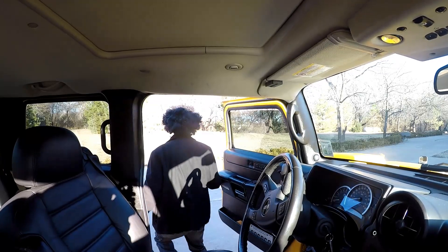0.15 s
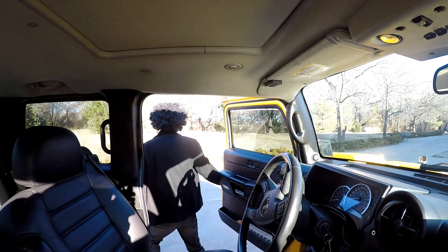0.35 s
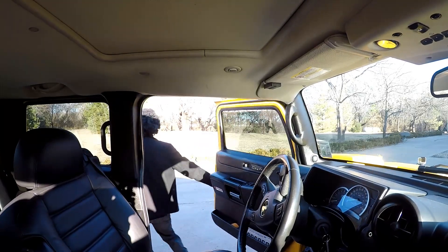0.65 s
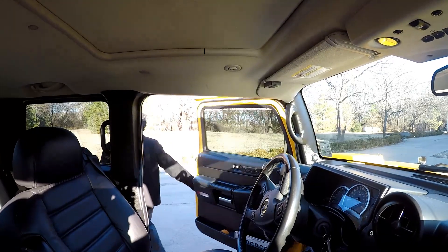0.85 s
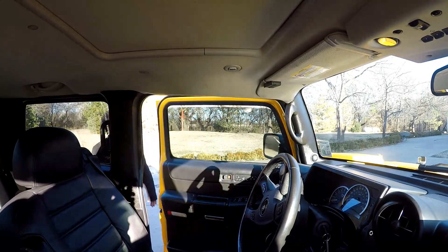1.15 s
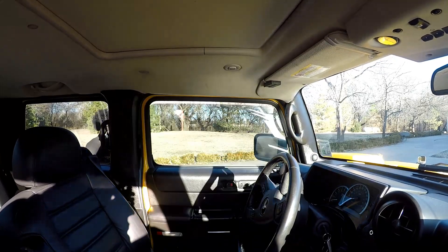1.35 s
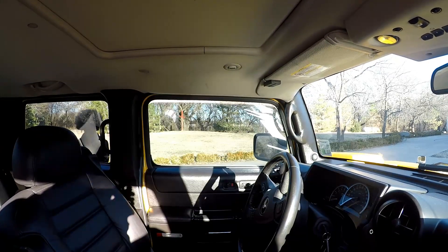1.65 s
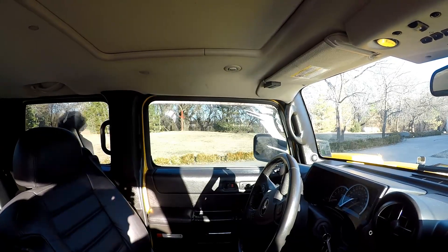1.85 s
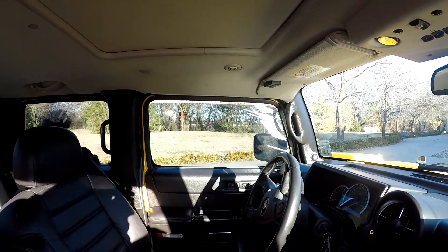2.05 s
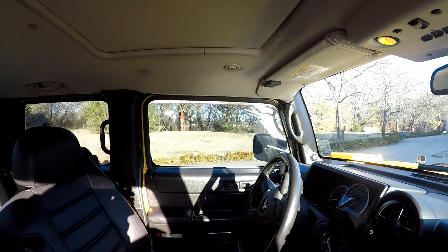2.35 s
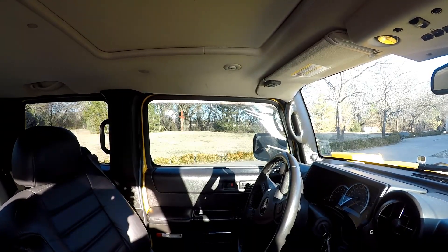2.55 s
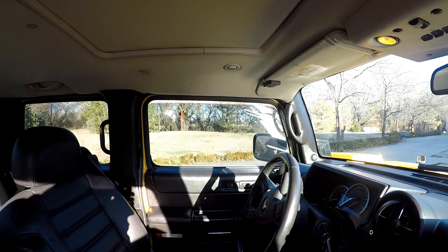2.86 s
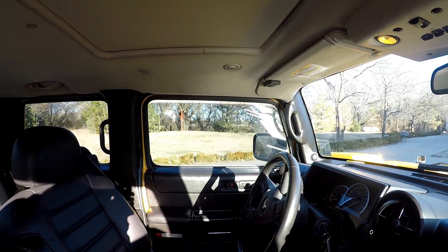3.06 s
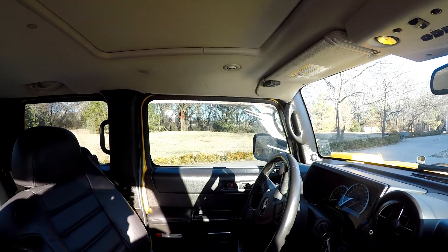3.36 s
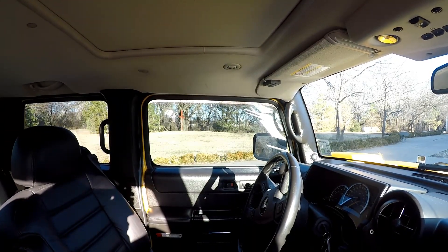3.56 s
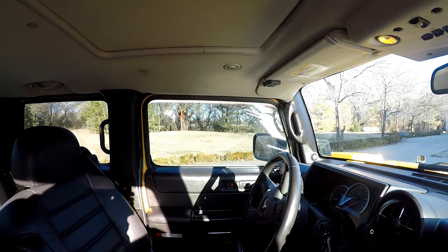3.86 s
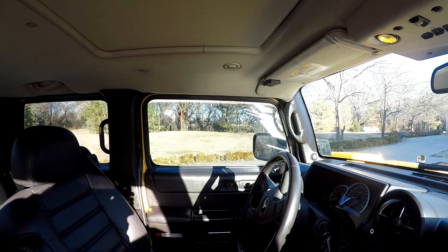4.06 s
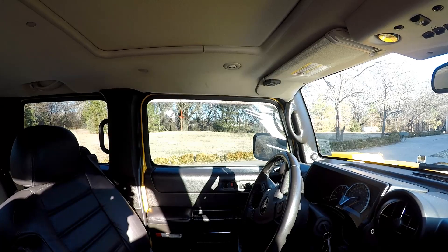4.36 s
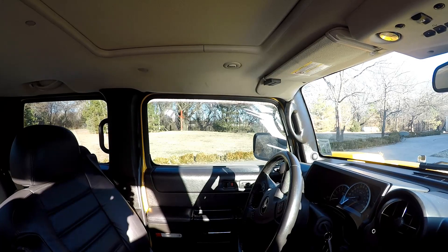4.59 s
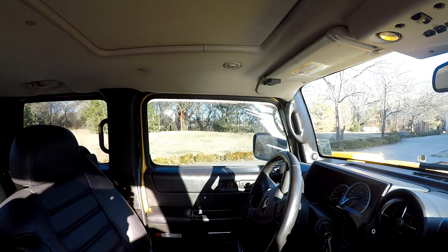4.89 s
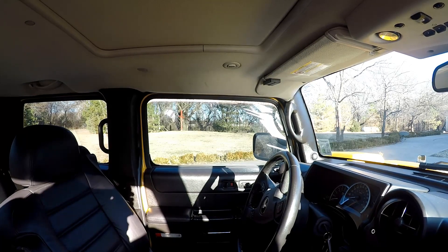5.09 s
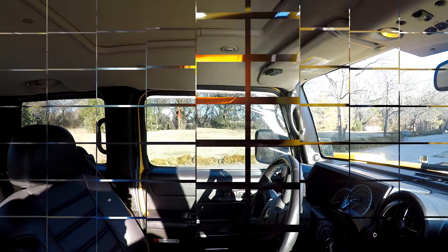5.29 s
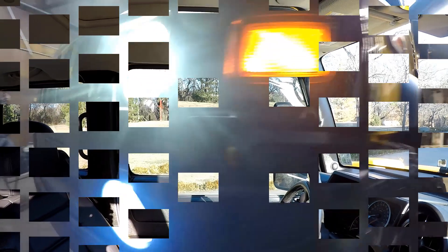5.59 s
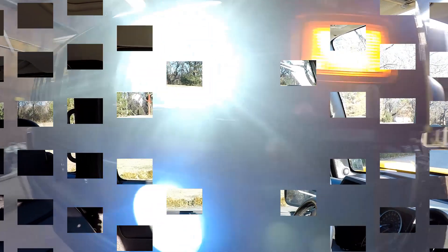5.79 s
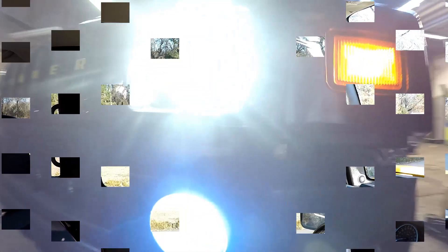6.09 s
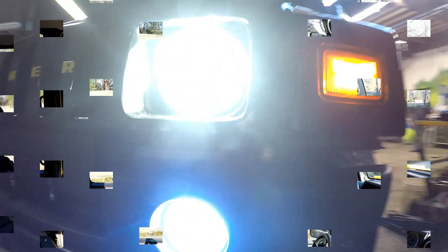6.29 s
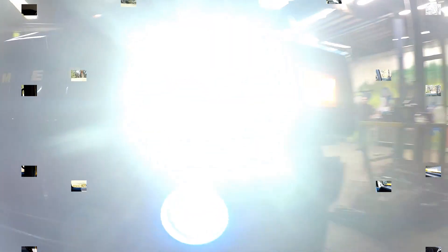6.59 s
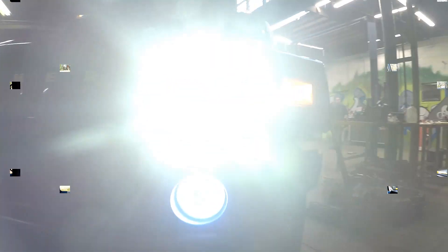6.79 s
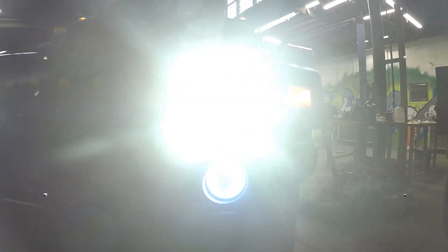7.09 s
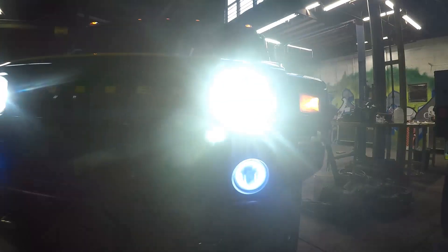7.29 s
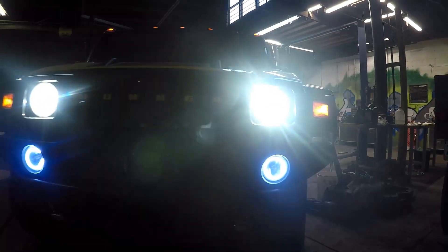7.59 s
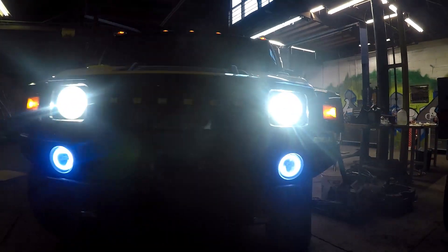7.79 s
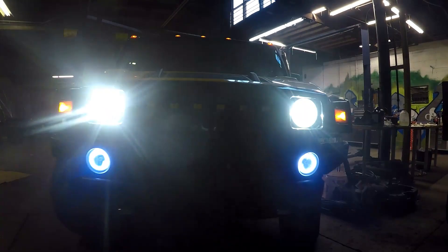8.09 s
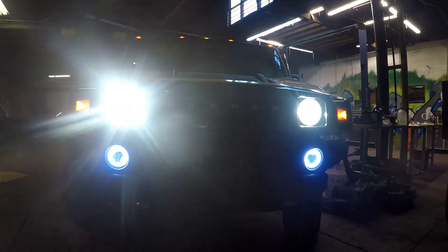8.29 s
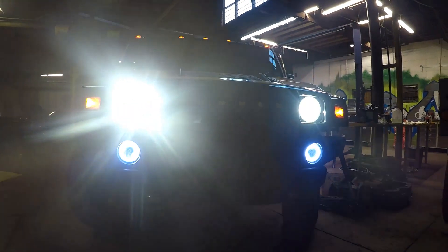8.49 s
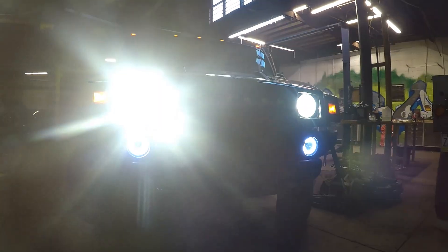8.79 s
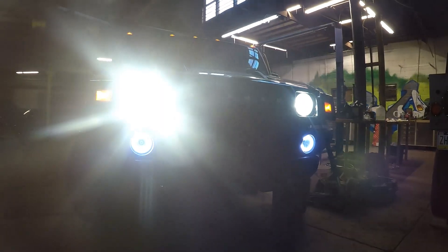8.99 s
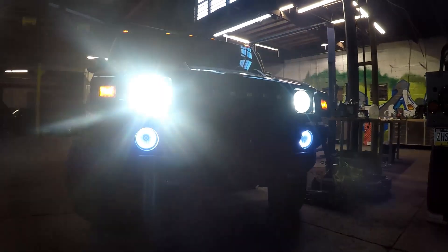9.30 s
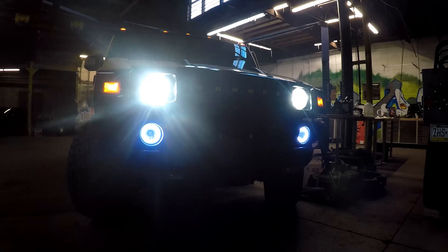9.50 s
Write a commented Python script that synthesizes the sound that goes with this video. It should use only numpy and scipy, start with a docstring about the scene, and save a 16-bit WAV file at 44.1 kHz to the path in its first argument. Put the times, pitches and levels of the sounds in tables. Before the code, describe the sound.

A microphone fixed in a truck cabin catches a handle snap, dull hinge bumps and a loud, boomy door slam with a short rattle. Quiet follows, with faint hiss, thin whine and low rumble, then a soft bass thud from another door. The sound crossfades to a hard-walled workshop where a big diesel idles steadily, with deep throbbing exhaust and rough metallic clatter, nearest at first, then slightly receding.

```python
"""Truck door slam, then an idling diesel V8

Inside a parked truck a fan hisses while the door is swung and slammed; the slam drives a gain control
down, and it creeps back. A second door thuds far off. The cabin fades into a workshop with the V8 idling,
heard from in front of the grille: uneven exhaust throb under the clatter of combustion.
Tones make the throb, noise bursts the combustion, rung resonators the door, coloured noise the rest."""
import sys
import numpy as np
from scipy import signal
from scipy.fft import rfft, irfft, next_fast_len
from scipy.io import wavfile
from scipy.ndimage import uniform_filter1d, minimum_filter1d, map_coordinates

SR = 44100
rng = np.random.default_rng(int(sys.argv[2]) if len(sys.argv) > 2 else 0)


def master_out(mix):
    """Clip the mix to full scale and print it as 16-bit PCM to the path in sys.argv[1]."""
    frames = np.transpose(np.atleast_2d(mix))
    ceiling = np.clip(frames, -1, 1)
    pcm = np.round(ceiling * 32767).astype(np.int16)
    wavfile.write(sys.argv[1], SR, pcm)


N = 425565
TIME = np.arange(N) / SR

# Idle speed. Each row: time [s], firing rate [firings/s].
IDLE_SPEED = [(6.3, 96.4), (7.5, 89), (7.9, 92), (8.6, 91.4), (9.65, 89.4)]
# Listener approaches the grille, then backs away. Each row: time [s], distance [m].
LISTENER_DISTANCE = [(6.52, 2.16), (6.76, 1.15), (7.4, 1.43), (8.0, 1.79), (8.6, 2), (9.65, 2.5)]
# Exhaust rumble. Each row: time [s], gain on the whole rumble mix [dB].
RUMBLE_LEVEL = [(6.7, -14.5), (7.45, -17), (7.72, -15), (8.05, -17), (9.3, -19.5)]
# Standing waves of the two low tones. Each: level before reflection [dB], node position [m],
# reflected share [0-1].
THROB_STANDING_WAVE = (-15.5, 2.23, 0.5)
HUM_STANDING_WAVE = (-16.5, 1.22, 0.51)
CLATTER_DB = -27.5


def engine():
    """One crankshaft drives exhaust and clatter; as the listener backs away, throb yields to firing hum."""
    firing_hz, = in_time(IDLE_SPEED)
    distance_m, = in_time(LISTENER_DISTANCE)
    rumble_db, = in_time(RUMBLE_LEVEL)
    cycles = np.cumsum(firing_hz) / len(CYLINDER_FIRINGS) / SR
    throb_db = standing_wave_db(THROB_STANDING_WAVE, firing_hz / 2, distance_m)
    hum_db = standing_wave_db(HUM_STANDING_WAVE, firing_hz, distance_m)
    return exhaust(cycles, throb_db, hum_db, rumble_db) + from_db(CLATTER_DB) * clatter(cycles)


# Cylinders in firing order. Each row: exhaust strength [dB], knock strength [dB], extra pipe delay [s].
CYLINDER_FIRINGS = [(0, 1, 0), (-3, -10, .0025), (1, 3, .0005), (-2, -8, .003), (2, 3, 0), (0, -8, .001),
                    (-4, 1, .003), (0, -10, .0015)]
# Lines from unequal cylinders. Each row: multiple of the engine cycle rate, level among the lines [dB].
UNEVEN_LINES = [(3, -10.5), (5, -8), (6, -4.5), (7, -8), (9, -5.5), (10, -5), (11, -15), (12, -7),
                (14, -11.5), (15, -11.5), (17, -21.5), (18, -14)]
# Exhaust spectrum. Each row: frequency [Hz], relative density [dB per Hz].
EXHAUST_SPECTRUM = [(20, -22), (60, -18.5), (85, -6), (125, -11), (165, -9), (200, -9.5), (245, -16.5),
                    (320, -17.5), (400, -23.5), (490, -30), (555, -40), (700, -33.5), (1200, -57)]


def exhaust(cycles, throb_db, hum_db, rumble_db):
    """Each bank throbs at half the firing rate; uneven pulses and gas puffs fill the room with rumble."""
    throb = from_db(throb_db) * engine_line(cycles, 4, waver=0.05)
    hum = from_db(hum_db) * engine_line(cycles, 8, waver=0.05)
    uneven = sum(from_db(db) * engine_line(cycles, multiple, waver=0.14) for multiple, db in UNEVEN_LINES)
    strength_db, _, delay_s = np.transpose(CYLINDER_FIRINGS)
    pulses = firings(cycles, strength_db, delay_s, spread_db=1.5, jitter_s=0.0007)
    puffs = bursts(pulses, decay_s=0.0057, rise_s=0.00093)
    gas = workshop(rms_one(pulses) + from_db(3.5) * puffs, wet_db=-1.5, t60_s=0.92)
    rumble = from_db(-6.0) * uneven + from_db(-2.0) * colour(gas, EXHAUST_SPECTRUM)
    return throb + hum + from_db(rumble_db) * rumble


# Engine block resonances. Each row: frequency [Hz], width [Hz], gain [dB].
BLOCK_RESONANCES = [(962, 57, 0), (1600, 140, 1.5), (2090, 110, 1.5), (2690, 100, -3.5), (4750, 210, 2)]
# Clatter spectrum. Each row: frequency [Hz], relative density [dB per Hz].
CLATTER_SPECTRUM = [(350, -50.5), (600, -20), (642, -10.5), (952, -10.5), (1140, -15.5), (1430, -1),
                    (1570, -1), (2370, -9.5), (2710, -4.5), (3560, -12.5), (4800, -12), (6300, -17.5),
                    (7830, -31.5), (12800, -45), (15400, -54)]


def clatter(cycles):
    """Knocks ring in the block and brighter valve ticks fill the gaps, over the rush of the cooling fan."""
    knock_db = np.array(CYLINDER_FIRINGS)[:, 1]
    knock_clicks = firings(cycles, knock_db, 0, spread_db=1.8, jitter_s=0.0012)
    knocks = bursts(knock_clicks, decay_s=0.0055, rise_s=0.0012)
    # 1/16 cycle is half a firing interval
    tick_clicks = firings(cycles + 1 / 16, np.zeros(len(CYLINDER_FIRINGS)), 0, spread_db=3.0, jitter_s=0.0013)
    ticks = bursts(tick_clicks, decay_s=0.0061, rise_s=0.00068)
    ringing = sum(from_db(db) * resonate(knocks, hz, width_hz) for hz, width_hz, db in BLOCK_RESONANCES)
    fan = from_db(-7) * rng.standard_normal(N)
    near = knocks + ringing + from_db(-0.5) * ticks + fan
    return colour(workshop(near, wet_db=-1.5, t60_s=1.0), CLATTER_SPECTRUM)


def firings(cycles, pattern_db, delay_s, spread_db, jitter_s):
    """One click per firing: each cylinder has its strength and delay, both varied at random every time."""
    at = np.flatnonzero(np.diff(np.floor(cycles * len(pattern_db))))
    strength, timing = np.clip(rng.standard_normal((len(at), 2)), -1.5, 1.5).T
    late = (np.resize(delay_s, len(at)) + jitter_s * timing) * SR
    place = np.clip(at + late.astype(int), 0, N - 1)
    clicks = np.zeros(N)
    clicks[place] = from_db(np.resize(pattern_db, len(at)) + spread_db * strength)
    return clicks


def bursts(clicks, decay_s, rise_s):
    """Each click lets off a short puff of noise; rms 1."""
    fall, rise = np.exp(-1 / (decay_s * SR)), np.exp(-1 / (rise_s * SR))
    envelope = signal.lfilter([1], [1, -fall - rise, fall * rise], clicks)
    return rms_one(envelope * rng.standard_normal(N))


def engine_line(cycles, multiple, waver):
    """A sine at a multiple of the cycle rate, slightly unsteady; rms near 1."""
    phase = 2 * np.pi * (multiple * cycles + rng.random())
    unsteady = drift(13) * np.sin(phase) + drift(12) * np.cos(phase)
    return np.sqrt(2) * (np.sin(phase) + waver * unsteady)


def standing_wave_db(wave, hz, distance_m):
    """Level of a tone where it meets its own reflection from the wall."""
    level_db, node_m, reflected = wave
    phase = 4 * np.pi * hz * (distance_m - node_m) / 343  # speed of sound, m/s
    return level_db + 20 * np.log10(np.abs(1 - reflected * np.exp(1j * phase)))


def workshop(x, wet_db, t60_s):
    """Direct sound plus the diffuse tail of a large hard room; rms 1."""
    tail = (rng.standard_normal(N) * dying(0.0035, t60_s, 0.0059))[:SR]
    wet = signal.fftconvolve(x, tail / np.linalg.norm(tail))[:N]
    return rms_one(x + from_db(wet_db) * wet)


# Shell, latch and loose parts. Each row: frequency [Hz], relative density [dB per Hz].
SHELL_SPECTRUM = [(65, 3.5), (115, 0.5), (165, -3), (200, 0), (240, -4), (300, 2), (350, -7.5), (420, -9.5),
                  (500, -19), (570, -24)]
LATCH_SPECTRUM = [(330, -45), (560, -17), (790, 0.5), (968, -4), (1120, -15.5), (1470, -1), (1640, -4),
                  (1870, -1.5), (2570, -13), (3000, -13.5), (3900, -37), (6600, -120)]
PARTS_SPECTRUM = [(1650, -31), (2800, -4.5), (3120, 0), (3400, -1), (5890, -0.5), (7610, -10), (8780, -15),
                  (10600, -29.5), (13100, -30.5), (15400, -43)]
# Door panel modes. Each row: frequency [Hz], level against the blow [dB], T60 [s].
PANEL_MODES = [(83.5, -5.5, 0.17), (117, 3.5, 0.24), (169.9, -5.5, 0.21), (233.4, -7, 0.22),
               (278, -13, .33)]
# Cabin air boom. Each row: frequency [Hz], level against the squeeze [dB], T60 [s].
BOOM_MODES = [(21.67, 13.5, 1.2), (18.5, 2.5, 1.7), (30.78, 1.5, 1), (55, 1, .9)]
# The door meets the seal first and squeezes the air gently.
SEAL_S, SEAL_DB = 1.56, -25.5


def door():
    """Every contact rings the panel and shakes shell, latch and loose parts; the slam also booms."""
    shell, latch, parts = noise(SHELL_SPECTRUM), noise(LATCH_SPECTRUM), noise(PARTS_SPECTRUM)
    chatter = from_db(1.6 * drift(200))
    shaken, blows = np.zeros(N), np.zeros(N)
    for start_s, panel_db, thud_db, clack_db, rattle_db, t60_s in door_contacts(count=6):
        blows[round(start_s * SR)] = from_db(panel_db)
        shaken += from_db(thud_db - 5.5) * shell * dying(start_s, 2.09 * t60_s, 0.0038)
        bright = from_db(clack_db) * latch + from_db(rattle_db) * parts
        shaken += bright * chatter * dying(start_s, t60_s, 0.0012)
    panel = sum(from_db(db) * ring(blows, hz, t60_s) for hz, db, t60_s in PANEL_MODES)
    squeeze = np.zeros(N)
    squeeze[round(SEAL_S * SR)] = from_db(SEAL_DB)
    squeeze[round(SLAM_BLOWS[0][0] * SR)] = 1
    boom = sum(from_db(db) * ring(squeeze, hz, t60_s) for hz, db, t60_s in BOOM_MODES)
    return shaken + panel - boom


# The door hits its frame, then seats in the seal. Each row: start [s], level before the mix [dB].
SLAM_BLOWS = [(1.595, -0.5), (1.619, -9.5)]
# Dull bumps as the door swings on its hinge. Each row: start [s], level before the mix [dB].
HINGE_BUMPS = [(.192, -32.5), (.645, -32.5), (.82, -42), (1.063, -21), (1.173, -34), (1.248, -30)]
# Clicks of hinge, latch and settling trim. Each row: start [s], clack [dB], rattle against the clack [dB],
# T60 [s].
TRIM_CLICKS = [(.235, -60, 7.5, 0.69), (1.054, -38, -25, .13), (1.519, -34.5, -4.5, .5),
               (1.557, -26.5, 0.5, 0.18), (1.588, -22.5, 6.5, 0.3), (1.85, -34, -3, 0.14),
               (2.272, -52.5, -9, .25), (3.029, -61.5, 10, .12)]
# Share-out of each kind of contact. Each: panel [dB], thud [dB], clack [dB], rattle [dB], T60 [s].
BUMP_SHARES = (0, -3.5, -23, -27.5, 0.06)
SLAM_SHARES = (3.5, 14, 6, -1.5, 0.1021)
REBOUND_SHARES = (-8, -1.5, -2, 0.5, 0.1566)
CLICK_PANEL_DB, CLICK_THUD_DB = -2, 2
REBOUND_DELAY_S, REBOUND_GAP_S, REBOUND_LOSS_DB = 0.037, 0.0222, 3


def door_contacts(count):
    """Bumps, clicks and the slam, then evenly spaced, weakening strikes of loose parts."""
    bumps = [contact(start_s, db, BUMP_SHARES) for start_s, db in HINGE_BUMPS]
    clicks = [contact(start_s, db, (CLICK_PANEL_DB, CLICK_THUD_DB, 0, rattle_db, t60_s))
              for start_s, db, rattle_db, t60_s in TRIM_CLICKS]
    slams = [contact(start_s, db, SLAM_SHARES) for start_s, db in SLAM_BLOWS]
    first_s = SLAM_BLOWS[0][0] + REBOUND_DELAY_S
    rebounds = [contact(first_s + k * REBOUND_GAP_S, -k * REBOUND_LOSS_DB, REBOUND_SHARES)
                for k in range(count)]
    return bumps + clicks + slams + rebounds


def contact(start_s, db, shares):
    """One blow: start s, panel dB, thud dB, clack dB, rattle dB, T60 s."""
    *shares_db, t60_s = shares
    return (start_s, *(db + np.array(shares_db)), t60_s)


# The handle snaps back as it is let go. Each row: start [s], level [dB], T60 [s].
HANDLE_SNAPS = [(.138, -37, 0.24), (0.1522, -17, 0.042), (0.162, -39, 0.12)]
# Snap spectrum. Each row: frequency [Hz], relative density [dB per Hz].
SNAP_SPECTRUM = [(120, -27), (200, 1), (309, 2), (566, -35), (752, -9), (1030, -13), (1330, -14.5),
                 (1990, -7), (2650, -12.5), (2880, -8), (3700, -21.5), (4450, -17), (11000, -52),
                 (14300, -83), (22000, -120)]


def handle():
    """A short, bright plastic snap: noise under fast decays with a flickering level."""
    envelope = sum(from_db(db) * dying(start_s, t60_s, 0.00081) for start_s, db, t60_s in HANDLE_SNAPS)
    return noise(SNAP_SPECTRUM) * from_db(1.2 * drift(398)) * envelope


# Second door, muffled by the closed cabin. Each row: start [s], level [dB], T60 [s].
FAR_DOOR_CONTACTS = [(4.817, -18.5, 0.21), (4.843, -26.5, 0.62)]
# Far thud spectrum. Each row: frequency [Hz], relative density [dB per Hz].
FAR_THUD_SPECTRUM = [(21, -33), (35, -10), (70, 5.5), (139, -11), (205, -0.5), (245, -17), (371, -25),
                     (450, -40), (580, -72), (990, -120)]


def far_door():
    """Only the bass of its two contacts gets through the bodywork."""
    envelope = sum(from_db(db) * dying(start_s, t60_s, 0.0051) for start_s, db, t60_s in FAR_DOOR_CONTACTS)
    return noise(FAR_THUD_SPECTRUM) * envelope


# Swells of the low rumble. Each row: crest time [s], crest level [dB].
RUMBLE_SWELLS = [(.35, -27), (1.65, -26), (3.9, -31), (5.05, -36)]
# Cabin spectra. Each row: frequency [Hz], relative density [dB per Hz].
RUMBLE_SPECTRUM = [(8.8, -30.5), (15, 1.5), (27, -1.5), (125, -13.5), (160, -46.5), (280, -120)]
DRONE_SPECTRUM = [(76, -34), (130, -2), (193, -0.5), (242, -9), (393, -14.5), (487, -23), (533, -37.5),
                  (560, -42), (730, -58), (1230, -120)]
FAN_SPECTRUM = [(310, -50), (520, -21), (574, -12), (731, 2), (944, -6.5), (985, -4.5), (1060, -16),
                (1170, -9.5), (1640, -3), (1840, -8), (2000, -8.5), (3240, -17), (6230, -14), (9670, -16),
                (15400, -31.5)]
OUTDOOR_SPECTRUM = [(75, 19), (103, 51), (135, 31), (165, 27), (260, 4.5), (550, -12), (1000, -4.5),
                    (1600, 5.5), (3000, 1), (6000, 4), (7500, -14), (12000, -20)]
SWELL_RISE_DB_PER_S, SWELL_FALL_DB_PER_S = 17, 8.5
DRONE_DB, FAN_DB, WHINE_DB, WHINE_HZ = -46, -58, -66.5, 1000
OUTDOOR_OPEN_DB, OUTDOOR_SHUT_DB = -37.5, -64.5


def cabin():
    """Swelling rumble, drone, a fan with a thin whine, and outdoor noise that drops as the door shuts."""
    swells_db = []
    for crest_s, db in RUMBLE_SWELLS:
        rise_db, fall_db = SWELL_RISE_DB_PER_S * (crest_s - TIME), SWELL_FALL_DB_PER_S * (TIME - crest_s)
        swells_db.append(db - np.maximum(rise_db, fall_db))
    rumble = from_db(np.max(swells_db, axis=0)) * noise(RUMBLE_SPECTRUM)
    drone = from_db(DRONE_DB) * noise(DRONE_SPECTRUM)
    fan = from_db(FAN_DB) * noise(FAN_SPECTRUM)
    whine = from_db(WHINE_DB) * np.sqrt(2) * np.sin(2 * np.pi * WHINE_HZ * TIME)
    outdoor_db = np.where(TIME < SLAM_BLOWS[0][0], OUTDOOR_OPEN_DB, OUTDOOR_SHUT_DB)
    return rumble + drone + fan + whine + from_db(outdoor_db) * noise(OUTDOOR_SPECTRUM)


def from_db(db):
    """Decibels to gain."""
    return 10 ** (np.asarray(db) / 20)


def rms_one(x):
    """Scale to unit rms."""
    return x / np.sqrt(np.mean(x ** 2) + 1e-20)


def in_time(rows):
    """One curve over TIME per column after the first."""
    knots_s, *columns = np.transpose(rows)
    return [np.interp(TIME, knots_s, column) for column in columns]


def colour(x, spectrum):
    """Shape x by a spectrum that falls 48 dB per octave beyond its ends; rms 1."""
    hz, db = np.transpose(spectrum)
    size = next_fast_len(N)
    octave = np.log2(np.maximum(np.arange(size // 2 + 1) * SR / size, 1))
    beyond = np.abs(octave - np.clip(octave, np.log2(hz[0]), np.log2(hz[-1])))
    gain = from_db(np.interp(octave, np.log2(hz), db) - 48 * beyond)
    return rms_one(irfft(rfft(x, size) * gain, size)[:N])


def noise(spectrum):
    """Coloured noise, rms 1."""
    return colour(rng.standard_normal(N), spectrum)


def drift(knots_per_s):
    """Smooth random curve through knots at the given rate; rms 1."""
    knots = rng.standard_normal(4000)
    return rms_one(map_coordinates(knots, [TIME * knots_per_s], order=2, mode="wrap"))


def resonate(x, hz, width_hz):
    """Two-pole resonance with unit peak gain."""
    r = np.exp(-np.pi * width_hz / SR)
    feedback = [1, -2 * r * np.cos(2 * np.pi * hz / SR), r * r]
    return signal.lfilter(np.array([1, 0, -1]) * (1 - r * r) / 2, feedback, x)


def ring(clicks, hz, t60_s):
    """A unit click starts a decaying sine of initial height 1."""
    r, w = from_db(-60 / (t60_s * SR)), 2 * np.pi * hz / SR
    # the tiny offset avoids slow denormal numbers
    return signal.lfilter([0, np.sin(w)], [1, -2 * r * np.cos(w), r * r], clicks + 1e-18)


def dying(start_s, t60_s, rise_s):
    """Envelope of a blow: a quick rise, then exponential decay."""
    age_s = np.maximum(TIME - start_s, 0)
    decay = np.exp(-np.minimum(np.log(1000) * age_s / t60_s, 40))
    return (1 - np.exp(-age_s / rise_s)) * decay


def gain_control(x, ceiling_db, hold_s, release_db_per_s):
    """Peaks over the ceiling pull the gain down, a few milliseconds ahead; it waits, then creeps back."""
    ahead = 220  # samples, 5 ms
    over_db = np.maximum(20 * np.log10(np.abs(np.roll(x, -ahead)) + 1e-9) - ceiling_db, 0)
    hold = int(hold_s * SR) | 1  # odd length
    held_db = -minimum_filter1d(-over_db, hold, origin=hold // 2)
    release_db = release_db_per_s * TIME
    cut_db = np.maximum.accumulate(held_db + release_db) - release_db
    return x * from_db(-uniform_filter1d(cut_db, size=2 * ahead))


FADE_START_S, FADE_END_S, FADE_IN_POWER = 6.27, 7.6, 1.47


def scene():
    """The gain-controlled cabin crossfades into the workshop."""
    fade = np.interp(TIME, [FADE_START_S, FADE_END_S], [0, 1])
    inside = cabin() + handle() + door() + far_door()
    inside = gain_control(inside, ceiling_db=0.7, hold_s=0.23, release_db_per_s=11.5)
    return ((1 - fade) * inside + fade ** FADE_IN_POWER * engine())[None]


CUTOFF_HZ = 15600


def record(dry):
    """Peaks clip at full scale, then a steep low-pass reaches 60 dB of cut at CUTOFF_HZ."""
    low_pass = signal.cheby2(14, 60, CUTOFF_HZ, fs=SR, output="sos")
    return signal.sosfilt(low_pass, np.clip(dry, -1, 1))


dry = scene()
out = record(dry)
master_out(out)
```